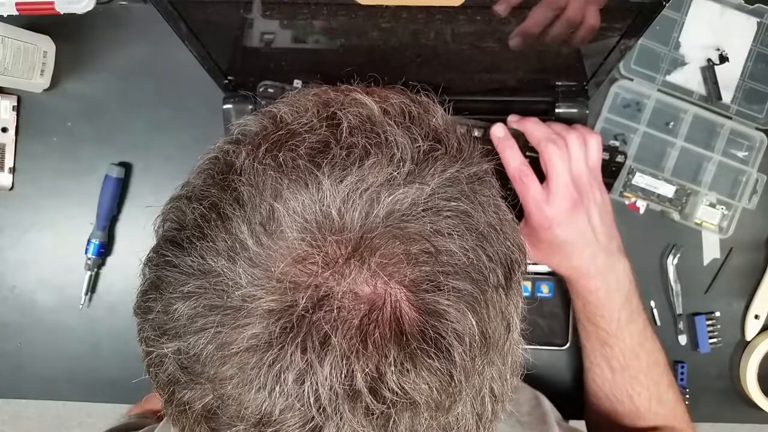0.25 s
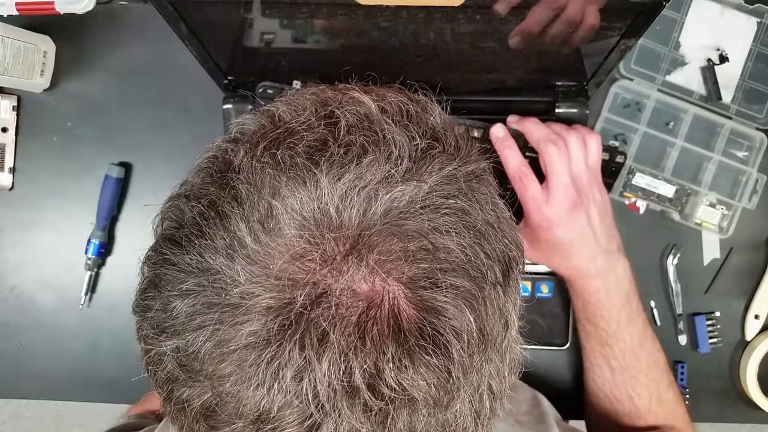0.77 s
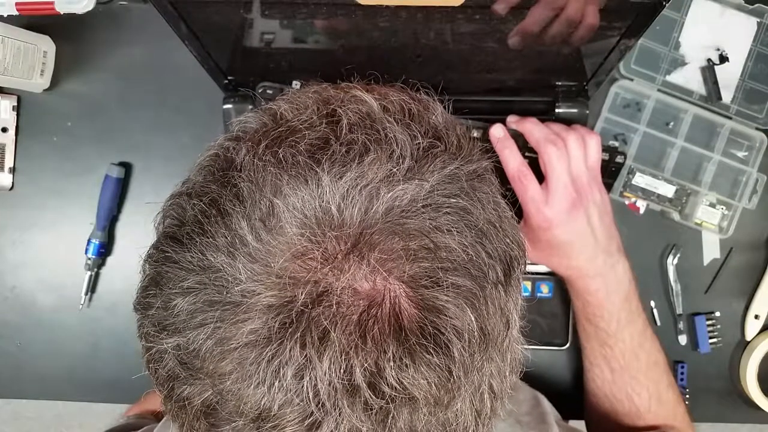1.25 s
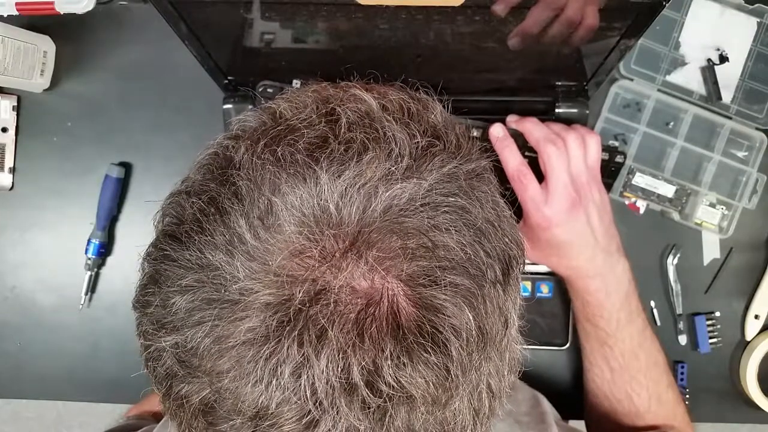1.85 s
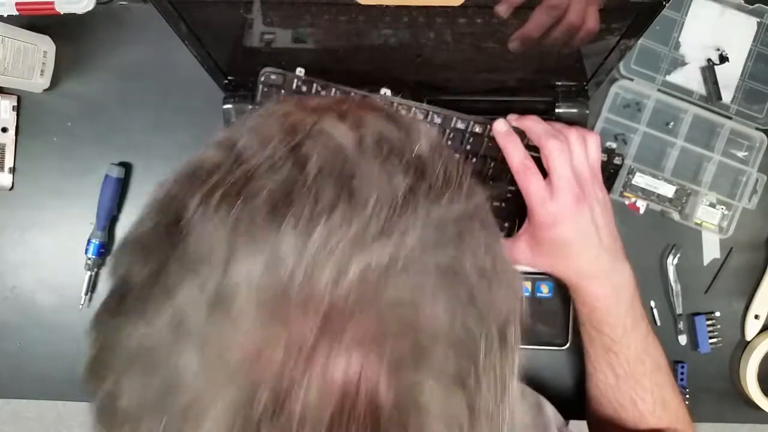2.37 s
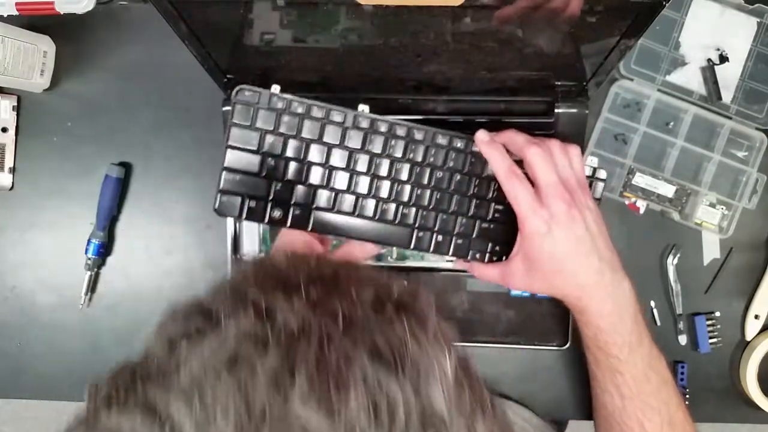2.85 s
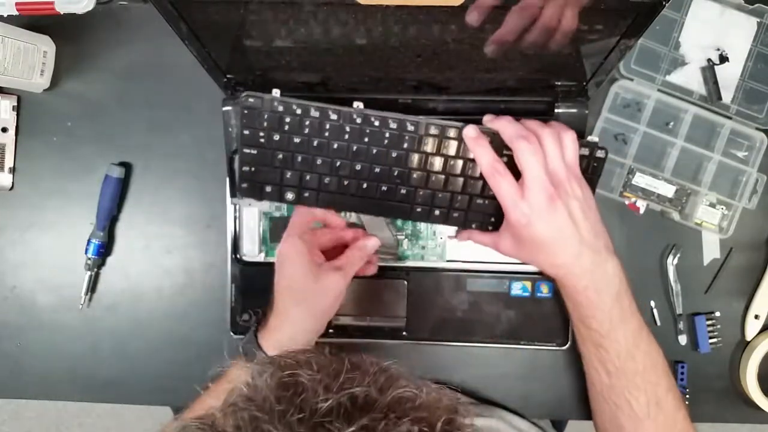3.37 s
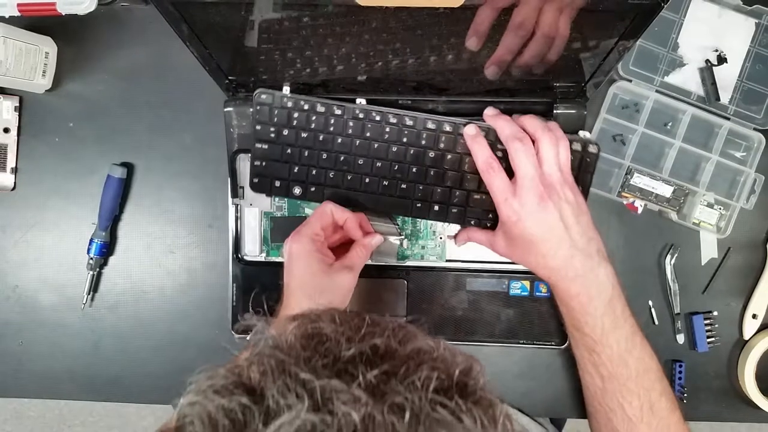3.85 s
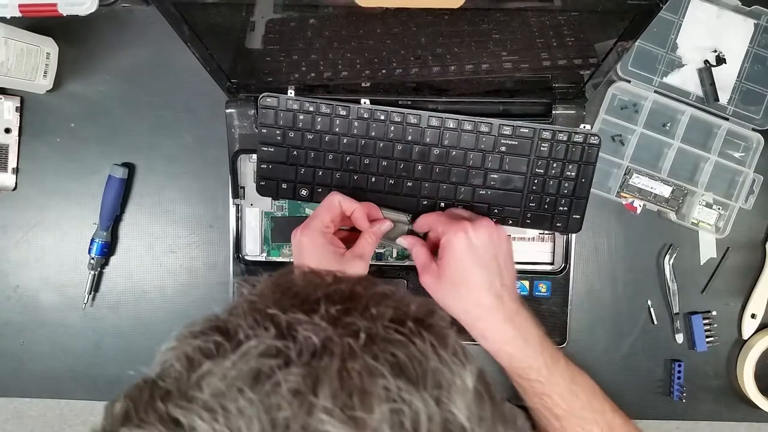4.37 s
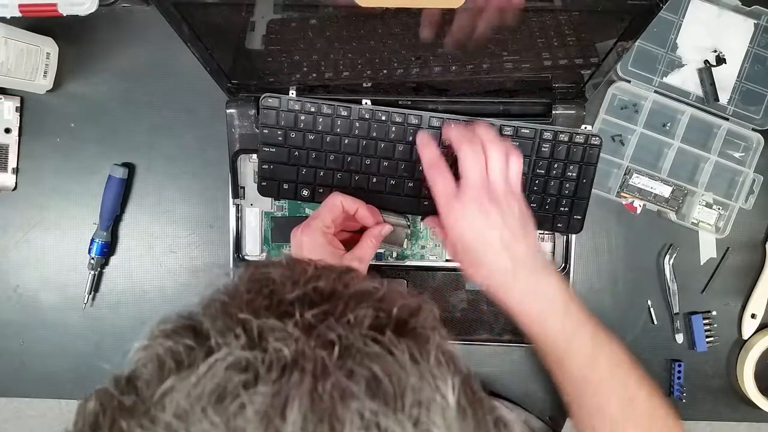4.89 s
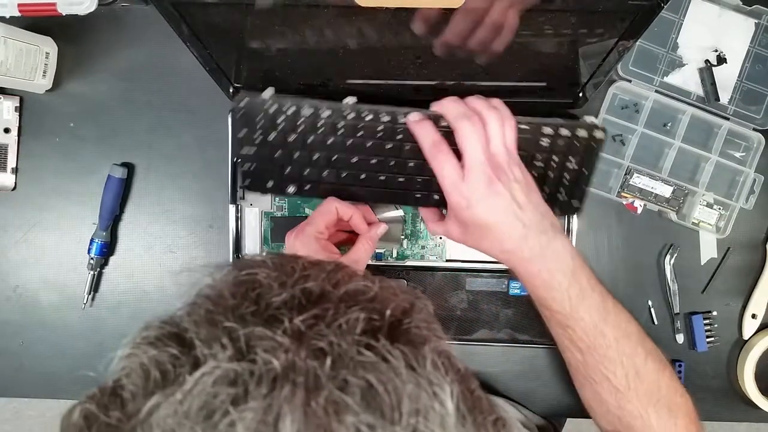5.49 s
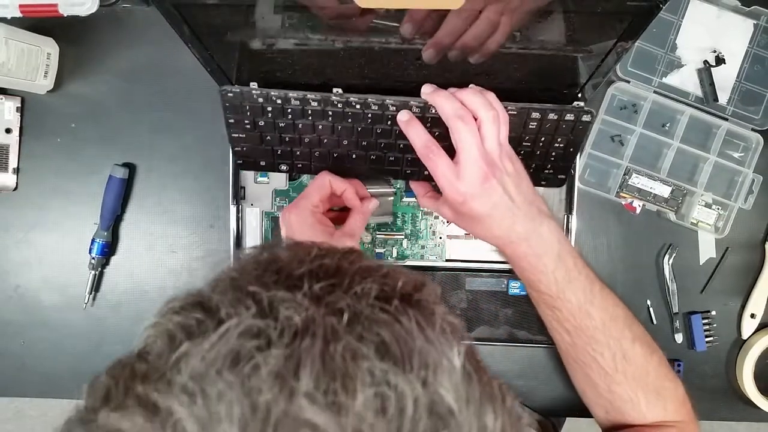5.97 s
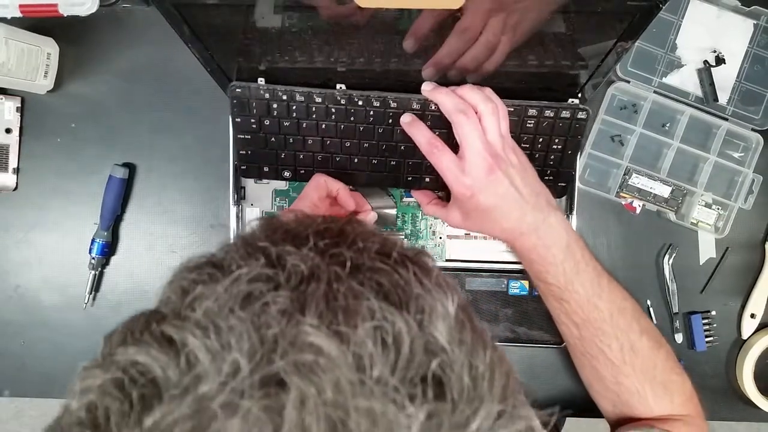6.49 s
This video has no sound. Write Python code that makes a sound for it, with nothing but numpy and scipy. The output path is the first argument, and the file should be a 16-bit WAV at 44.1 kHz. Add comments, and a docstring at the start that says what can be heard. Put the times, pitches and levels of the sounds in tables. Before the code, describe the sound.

Crisp plastic snaps and finger rustle as a laptop keyboard is handled and set down, dull desk knocks beneath, quiet humming room with faint ticks.

```python
"""A wavering hum and low room noise, a band of hiss in the left port only, and a faint tick there twice a second.
Then a thin plastic keyboard is lifted, handled and set down on an open laptop on a desk, below a two-port microphone.
Clicks are dying noise crackles that ring keyboard modes; finger rustle is uneven noise driving the same modes.
Desk thumps are soft pulses ringing low modes. Clicks and rustle reach the right port best, thumps both nearly alike."""
import sys
import numpy as np
from scipy import signal
from scipy.fft import rfft, irfft, next_fast_len
from scipy.io import wavfile
from scipy.ndimage import uniform_filter1d

SR = 44100
rng = np.random.default_rng(int(sys.argv[2]) if len(sys.argv) > 2 else 0)


def volts(x):
    """Linear amplitude factor 10**(x/20) for a level x in dB, scalar or array-like."""
    e = np.asarray(x, float) / 20
    return 10 ** e


def master_out(mix):
    """Clip the mix to full scale and print it as 16-bit PCM to the path in sys.argv[1]."""
    frames = np.transpose(np.atleast_2d(mix))
    ceiling = np.clip(frames, -1, 1)
    pcm = np.round(ceiling * 32767).astype(np.int16)
    wavfile.write(sys.argv[1], SR, pcm)


N = 296555

# blows through the keyboard into the desk: start_s, desk_relative_db, keyboard_body_db, contact_s,
# ring_time_factor (low under a pressing hand)
BLOWS = [(1.06, -29.5, -75, 0.0069, 0.56), (1.333, -40.5, -68, 0.0035, .55),
         (1.406, -16, -72, 0.0094, 0.63), (1.464, -28.5, -72, 0.0067, .51), (1.89, -38, -65, 0.0018, 0.26),
         (1.934, -55, -61, 0.0052, .48), (2.463, -33, -63, 0.0041, 0.46), (2.535, -25, -66, 0.0039, 0.15),
         (2.632, -34, -64, 0.0035, 0.51), (3.388, -46.5, -59.5, 0.0015, 0.36),
         (3.789, -40, -61, 0.0048, 0.46), (3.9, -33.5, -56, .004, .41), (3.9438, -16.5, -37, 0.0023, 0.86),
         (3.96, -16, -40.5, 0.0068, 0.86), (3.976, -26, -41, .002, .55), (3.99, -28, -55, 0.0021, 0.61),
         (5.139, -47, -65, 0.0015, 0.61), (5.283, -15, -41, 0.0039, 0.15), (5.311, -41, -57, 0.0028, .55),
         (5.363, -32, -69, 0.0049, 0.45), (5.385, -33, -57.5, 0.0012, 0.21), (5.399, -19, -47, 0.002, 0.11),
         (5.414, -18.5, -47, 0.0032, 0.68), (5.428, -16, -40.5, 0.0042, 0.69),
         (5.459, -19.5, -53, 0.0057, 0.95), (5.47, -28, -66, 0.0024, 0.4), (5.489, -25, -53, 0.0036, 0.6),
         (5.505, -35, -69, 0.0035, 0.23), (5.659, -42, -70.5, 0.0023, 0.77), (5.71, -37, -53, 0.0016, 0.77),
         (5.897, -24.5, -61, 0.0039, 0.74), (5.93, -36.5, -68, 0.0031, .95), (5.964, -38, -73, 0.002, 1),
         (6.101, -38, -72, 0.0035, .63), (6.321, -43, -69, 0.0022, 0.77), (6.364, -38, -66, 0.003, 0.91),
         (6.518, -62, -54.5, 0.0031, .55), (6.572, -32.5, -68, 0.0065, 0.52)]
# keyboard modes: mode_hz, relative_db, t60_s (before the ring-time factor)
KEY_MODES = [(330, -6, .03), (480, -14, .025), (620, -5, .035), (750, 3, .05), (930, 2, .045),
             (1100, -7, .03), (1280, -3, .035), (1650, 2, .05), (1980, 0, .05), (2400, -1, .035),
             (2680, -1, .03), (3350, 0, .025), (3650, 0, .025), (3900, 0, .025), (4200, 0, .025),
             (4600, 1, .03), (5000, -4, .02)]
# bright plastic contact spectrum: freq_hz, relative_db_per_hz
SNAP_SPECTRUM = [(400, -29), (900, -19), (2500, -14.5), (4000, -10.5), (5500, -16), (7500, -16),
                 (9400, -20), (10400, -5), (12000, -2.5), (14000, -6), (15700, -3.5), (15950, -50)]
LAG_S = .001  # keyboard body sounds this much before the nominal blow, desk this much after


def evened(x):
    """Scales to rms 1."""
    return x / np.sqrt(np.mean(x ** 2) + 1e-20)


def read(points, hz):
    """Interpolates a table on a log-frequency axis."""
    f, value = np.transpose(points)
    return np.interp(np.log(hz + 1), np.log(f + 1), value)


def add(mix, start_s, sound):
    """Mixes a sound in at start_s, cut at the end of the mix."""
    part = mix[round(start_s * SR):][:len(sound)]
    part += sound[:len(part)]


def colour(x, points, unit=True):
    """Filters by a spectrum; with unit, white noise keeps its rms."""
    size = next_fast_len(N + 4096)
    gain = volts(read(points, np.fft.rfftfreq(size, 1 / SR)))
    if unit:
        gain = evened(gain)
    return irfft(rfft(x, size) * gain, size)[..., :N]


def ring(modes, spread_db=0., free=0.61):
    """Impulse response of exponentially dying modes; free scales their t60."""
    hz, db, t60_s = np.transpose(modes)[:, :, None]
    t = np.arange(SR // 5) / SR
    decay_db = -60 * t / np.clip(free * t60_s, .005, 1)
    return (volts(db + spread_db + decay_db) * np.sin(2 * np.pi * hz * t)).sum(0)


def crackle(t60_s):
    """Envelope of a contact: a spike, then a dying scatter."""
    t = np.arange(SR // 5) / SR
    scatter = volts(-60 * t / np.clip(t60_s, .004, .3))
    spike = 1.2 * np.exp(-t / .0005)
    return (1 - np.exp(-t / .0003)) * (scatter + spike)


def knock(modes, fade, luck):
    """A short rough contact rings the modes, nearly alike at both ports."""
    a, b = luck
    envelope = fade[:1000] * np.exp(-np.arange(1000) / SR / .004)
    contact = np.array([.85 * a + .5 * b, a]) * envelope
    sound = signal.fftconvolve(modes[None], contact, axes=1)
    return sound.T / np.sqrt(np.mean(sound[1, :250] ** 2))


def pair(x, wet_db):
    """Adds a decaying noise tail, different per port, as room sound, and shades the left port."""
    # room decay: freq_hz, t60_s
    room_decay = [(300, 0.2), (1500, 0.16), (4000, 0.31), (12000, 0.12)]
    # shading of the left port: freq_hz, gain_db
    left_shading = [(200, -.5), (700, -5), (2400, -10), (4400, -10), (5500, -20), (8500, -20), (11000, -13),
                    (15000, -11.5)]
    hz, t, z = signal.stft(rng.standard_normal((2, SR // 2)), SR, nperseg=128)
    decay = volts(-60 * t / read(room_decay, hz)[:, None])
    tail = signal.istft(z * decay, SR, nperseg=128)[1]
    tail[:, :150] = 0  # first reflection after 3 ms
    wet = signal.fftconvolve(x, tail / np.linalg.norm(tail[0]), axes=1)[:, :N]
    both = x + volts(wet_db) * wet
    return np.array([colour(both[0], left_shading, unit=False), both[1]])


def room():
    """Room noise with shared bass, hiss at the left port, and two hum bands as wavering carriers."""
    # steady layers: time_s, low_hum_db, hiss_relative_db
    layers = [(0, -52.5, -60), (.6, -56.5, -60), (1.16, -49, -57.5), (1.6, -44, -56.5), (1.96, -48.5, -55),
              (2.15, -56, -58), (2.5, -72, -59.5), (3.0, -56.5, -58), (3.5, -52, -57), (3.66, -64, -58.5),
              (4.12, -48.5, -59), (4.25, -60, -60.5), (4.55, -59, -62.5), (5.1, -58, -63),
              (5.5, -56, -58.5), (5.75, -54, -61), (6.03, -58, -59), (6.2, -53, -61), (6.72, -60, -60)]
    # room and microphone noise before the swell: freq_hz, level_db_per_hz
    noise_floor = [(20, -94.5), (45, -78.5), (90, -72.5), (170, -83.5), (350, -93.5), (700, -104),
                   (1300, -113), (2100, -115), (3000, -107), (3700, -103), (4600, -107), (6000, -134),
                   (9700, -133), (11000, -123), (15800, -118)]
    # left-right likeness: freq_hz, likeness_0_to_1
    likeness = [(60, 0.96), (160, 0.75), (270, 0.67), (450, 0.05), (800, 0.0106)]
    # hiss band: freq_hz, relative_db_per_hz
    hiss_spectrum = [(1240, -84), (2100, -37), (2320, -29), (2440, -29), (2570, -16), (2690, -13),
                     (2930, -22), (3360, 0), (3600, 2), (4570, -7), (4920, -18.5), (6000, -47),
                     (7800, -80.5), (13200, -120)]
    # hum bands: centre_hz, width_hz
    hum_bands = [(58.5, 7.2), (121, 18)]
    upper_hum_db = -62
    s, low_hum_db, hiss_db = np.transpose(layers)
    bass_db = 0.5 + 0.6 * (hiss_db - hiss_db.mean())  # low noise swells with the hiss, dB per dB

    frames, hz = N // 512 + 5, np.fft.rfftfreq(2048, 1 / SR)
    t = np.arange(frames) * 512 / SR
    a, b, c, d, e, f = rng.standard_normal((frames, 1025, 6)).T
    left = a + 1j * b
    same = np.clip(read(likeness, hz), 0, 1)[:, None]
    z = np.array([left, same * left + np.sqrt(1 - same ** 2) * (c + 1j * d)])
    bass_share = 1 / (1 + (hz[:, None] / 2400.0) ** 2)
    floor_db = read(noise_floor, hz)[:, None] + bass_share * np.interp(t, s, bass_db)
    z *= volts(floor_db) * (hz < 16000)[:, None]
    scale = np.sqrt(SR / 2) / np.std(signal.istft(left, nperseg=2048, noverlap=1536)[1])
    out = scale * signal.istft(z, nperseg=2048, noverlap=1536)[1][:, :N]

    in_band = (hz > hiss_spectrum[0][0]) & (hz < hiss_spectrum[-1][0])
    hiss_gain = (in_band * volts(read(hiss_spectrum, hz)))[:, None]
    hiss = signal.istft((e + 1j * f) * hiss_gain, nperseg=2048, noverlap=1536)[1][:N]
    t = np.arange(N) / SR
    out[0] += volts(np.interp(t, s, hiss_db) + 7.5) * evened(hiss)

    for (hum_hz, width_hz), db in zip(hum_bands, (low_hum_db, upper_hum_db + 0 * s)):
        r = np.exp(-np.pi * width_hz / SR)
        waver = [1, 1j] @ rng.standard_normal((2, N))
        for _ in range(2):
            waver = signal.lfilter([1], [1, -r], waver)
        waver = 1.0 + 0.78 * waver / np.std(waver)  # a steady core with a drifting part
        hum = (waver * np.exp(2j * np.pi * hum_hz * t)).real
        out += volts(np.interp(t, s, db)) * evened(hum)
    return out


def ticks():
    """Faint dry ticks on a steady beat: very short noise bursts, strongest at the left port."""
    # tick level before colouring: time_s, relative_db
    tick_levels = [(0, -65), (.7, -56), (1.7, -57), (3.2, -47), (4.2, -48), (4.7, -55), (5.3, -62),
                   (6.2, -51), (6.72, -50)]
    # tick spectrum: freq_hz, relative_db_per_hz
    tick_spectrum = [(5000, -25), (8500, -26), (11000, -1), (13000, -13), (15000, 1), (16000, -11),
                     (16500, -37)]
    start_s, every_s = .1855, .49885
    train = np.zeros(N)
    for s in np.arange(start_s, N / SR, every_s):
        burst = np.exp(-np.arange(60) / 10.0) * rng.choice([-1., 1.], 60)
        add(train, s, volts(np.interp(s, *np.transpose(tick_levels))) * burst)
    return colour(train, tick_spectrum) * volts(np.array([[0], [-18.]]))


def rubbed(column):
    """Gain curve of one column of the sliding table, -120 dB before its first row."""
    # fingers sliding on plastic: time_s, bright_rustle_relative_db, body_relative_db, desk_drag_relative_db
    slides = [(1.3, -95, -77, -92), (1.51, -77, -74, -56), (1.85, -81, -76, -71), (2.0, -69, -63, -69),
              (2.18, -71, -68, -69), (2.33, -86.5, -84, -77), (2.59, -66.5, -62, -51.5),
              (2.82, -81, -78, -66.5), (2.9, -68.5, -66, -67), (3.12, -64.5, -87, -72),
              (3.16, -69.5, -71, -76), (3.4, -68, -78, -70.5), (3.62, -68.5, -81, -70),
              (3.77, -82, -87, -62), (4.03, -63, -63, -63), (4.22, -68.5, -67.5, -70),
              (4.451, -83, -80, -71.5), (5.2, -89.5, -91, -61.5), (5.265, -62, -63, -56),
              (5.33, -67, -61, -47), (5.375, -48, -54, -61), (5.425, -42.5, -39.5, -60),
              (5.5, -56, -49.5, -48), (5.57, -64.5, -67, -69.5), (5.75, -71, -64, -56.5),
              (5.9, -71, -65.5, -59.5), (6.06, -63.5, -61.5, -56.5), (6.25, -81, -72, -61),
              (6.4, -79, -69, -71), (6.72, -76, -71.5, -57.5)]
    s, db = np.array(slides)[:, [0, column]].T
    return volts(np.interp(np.arange(N) / SR, s, db, left=-120))


def desk():
    """Soft blows and dragging ring the low modes of the desk, which radiates no deep bass."""
    # desk modes: mode_hz, relative_db, t60_s (before the ring-time factor)
    desk_modes = [(130.4, -15, 0.62), (185.6, -9.5, 0.1), (209.8, -2.5, 0.12), (228.3, -1, 0.19)]
    sound = np.zeros(N)
    for s, db, _, contact_s, free in BLOWS:
        phase = np.clip(np.arange(1000) / SR / np.clip(contact_s, .0005, .02), 0, 1)
        blow = np.sin(np.pi * phase) ** 2
        thump = signal.fftconvolve(blow / blow.sum(), ring(desk_modes, free=free))
        add(sound, s + LAG_S, -volts(db - 4.5) * thump)
    drag = evened(signal.oaconvolve(rng.standard_normal(N), ring(desk_modes))[:N])
    sound += volts(-1.0) * rubbed(3) * drag
    sound = signal.sosfilt(signal.butter(3, 120., "high", fs=SR, output="sos"), sound)
    return np.array([np.roll(sound, shift=6), sound])  # the left port is a little further off


def rustle():
    """Uneven slips of skin in clumps, with sparse catches: bright grit that also drives the keyboard modes."""
    # skin drag on the keys: freq_hz, relative_db_per_hz
    drag_spectrum = [(2200, -32.5), (2900, -12), (3600, -7), (4600, -6.5), (5300, 18), (6000, -22)]
    left_db = 8.5  # sliding spreads over the whole part and reaches the left port better than a click does
    catches_per_s, catch_decay_s = 90., 0.00072
    fine, clumps = (evened(uniform_filter1d(rng.standard_normal(N), size=n)) for n in (150, 1200))
    catches = (rng.random(N) < catches_per_s / SR) * rng.exponential(1, N)
    catches = signal.lfilter([1], [1, -np.exp(-1 / (catch_decay_s * SR))], catches)
    unevenness = volts(1.5 * fine + 2.5 * clumps) * (1 + .8 * catches)
    slips = evened(unevenness * rng.standard_normal((2, N)))
    bright = colour(slips, SNAP_SPECTRUM) + volts(-13.0) * colour(slips, drag_spectrum)
    bright *= volts(np.array([[left_db], [0]]))
    shared = np.array([.8 * slips[1] + .6 * slips[0], slips[1]])
    damped = ring(KEY_MODES[:11])[None, :200] * np.hanning(400)[200:]  # a held part is damped
    body = evened(signal.oaconvolve(shared, damped, axes=1)[:, :N])
    return volts(-1.0) * (rubbed(1) * bright + rubbed(2) * body)


def keyboard_blows():
    """Each blow into the desk also rings the keyboard modes, weaker above 1050 Hz and below 680 Hz."""
    body = np.zeros((N, 2))
    hz = np.array(KEY_MODES)[:, :1]
    tilt_db = -18. * np.maximum(np.log2(hz / 1050), 0) - 6.7 * np.maximum(np.log2(680 / hz), 0)
    low = ring(KEY_MODES, tilt_db)
    for (s, _, body_db, *_), luck in zip(BLOWS, rng.standard_normal((len(BLOWS), 2, 1000))):
        add(body, s - LAG_S, volts(body_db) * knock(low, crackle(0.025), luck))
    return body.T


def clicks():
    """Each plastic click is a dying bright crackle and rings the modes near the pitch of the struck spot."""
    # plastic clicks: start_s, snap_relative_db, spot_ring_db, spot_pitch_hz, snap_t60_s
    click_list = [(1.431, -48.5, -59, 4220, 0.029), (1.463, -58, -60, 570, .05),
                  (1.851, -48.5, -46.5, 1310, 0.046), (1.882, -44, -54, 1305, 0.1),
                  (1.888, -30, -43.5, 4460, 0.033), (1.9268, -20.5, -39, 4700, 0.019),
                  (1.9302, -23, -46.5, 1650, .024), (1.955, -49, -45, 970, 0.033),
                  (1.984, -26.5, -48.5, 4330, 0.022), (2.061, -76, -51.5, 726, .044),
                  (2.453, -60, -58.5, 3330, .046), (2.465, -70, -53.5, 745, .04),
                  (2.533, -53, -53, 720, .12), (2.585, -55, -63, 3730, .037), (2.626, -53, -52, 3350, .07),
                  (2.632, -46, -44.5, 2140, 0.07), (2.859, -57.5, -58.5, 3850, 0.098),
                  (2.905, -55, -55, 3420, 0.096), (2.972, -55.5, -72, 4390, 0.046),
                  (3.084, -53, -75, 4150, 0.075), (3.32, -52, -74, 4370, 0.078),
                  (3.384, -47, -61, 900, .065), (3.39, -34, -50, 1620, 0.019),
                  (3.793, -45.5, -56, 1000, 0.14), (3.857, -54, -62, 2700, 0.054),
                  (3.87, -54, -60, 4890, .04), (3.897, -38, -56, 1660, 0.11),
                  (3.9415, -19, -35.5, 3240, 0.046), (3.9561, -29, -36, 3180, 0.2),
                  (3.9718, -47, -46.5, 3500, 0.14), (4.045, -50, -65, 3900, 0.055),
                  (5.136, -70, -65.5, 760, .073), (5.2719, -50, -50, 1200, 0.098),
                  (5.283, -30.5, -38.5, 3330, 0.057), (5.343, -48, -66, 4600, .11),
                  (5.362, -24.5, -56, 3350, 0.042), (5.369, -52.5, -47, 3840, .11),
                  (5.384, -33, -54, 1000, 0.12), (5.396, -32.5, -37.5, 1680, 0.16),
                  (5.401, -32, -34, 1590, 0.037), (5.4266, -21.5, -45, 1690, 0.078),
                  (5.44, -37, -38, 3200, 0.1), (5.449, -43, -39.5, 3330, 0.13),
                  (5.463, -48, -42, 1650, .061), (5.656, -39.5, -53, 3560, 0.052),
                  (5.688, -74, -50.5, 2640, .041), (5.711, -41.5, -75, 1980, 0.14),
                  (5.872, -70, -52.5, 695, 0.083), (6.119, -75, -59, 1160, 0.05),
                  (6.404, -62, -66, 2400, .043), (6.518, -39, -54.5, 2720, 0.016),
                  (6.569, -55, -60, 2570, 0.16)]
    snap, body = np.zeros(N), np.zeros((N, 2))
    hz = np.array(KEY_MODES)[:, :1]
    lucks = rng.standard_normal((len(click_list), 2, 1000))
    for (s, snap_db, spot_db, spot_hz, t60_s), luck in zip(click_list, lucks):
        fade = crackle(t60_s)
        add(snap, s, volts(snap_db - 4.0) * fade)
        spot = ring(KEY_MODES, np.maximum(-60 * np.log2(hz / spot_hz) ** 2, -18), free=.38)
        add(body, s, volts(spot_db) * knock(spot, fade, luck))
    grain = evened(volts(3.5 * evened(uniform_filter1d(rng.standard_normal(N), size=70))))
    return colour(snap * grain * rng.standard_normal((2, N)), SNAP_SPECTRUM) + body.T


def scene():
    """Keyboard and desk sounds in the room, over the background."""
    background = room() + ticks()
    keyboard = rustle() + keyboard_blows() + clicks()
    return background + pair(desk(), wet_db=-13.0) + pair(keyboard, wet_db=-8.0)


def top_cut(x):
    """Nothing passes above the cut-off."""
    return signal.sosfilt(signal.butter(12, 16970, fs=SR, output="sos"), x)


def record(dry):
    """The microphone drops the deepest bass and has a small steady offset."""
    heard = signal.sosfilt(signal.butter(2, 42., "high", fs=SR, output="sos"), dry)
    heard = heard - .0004
    return top_cut(heard)


dry = scene()
out = record(dry)
master_out(out)
```